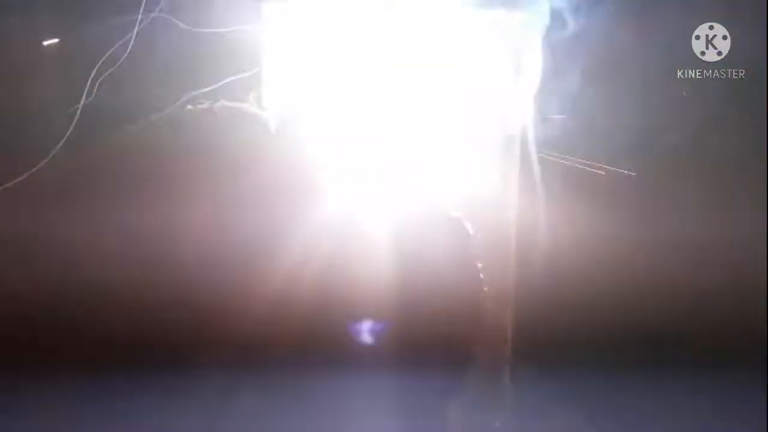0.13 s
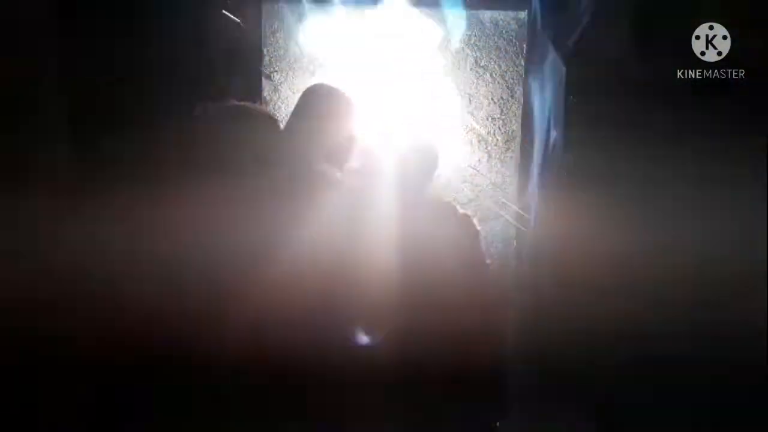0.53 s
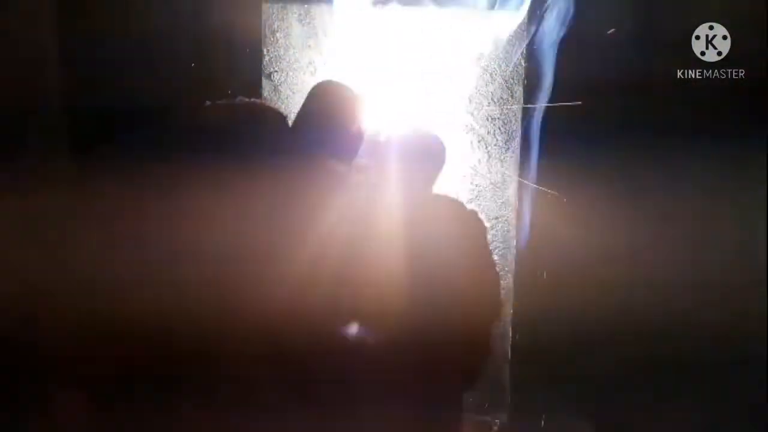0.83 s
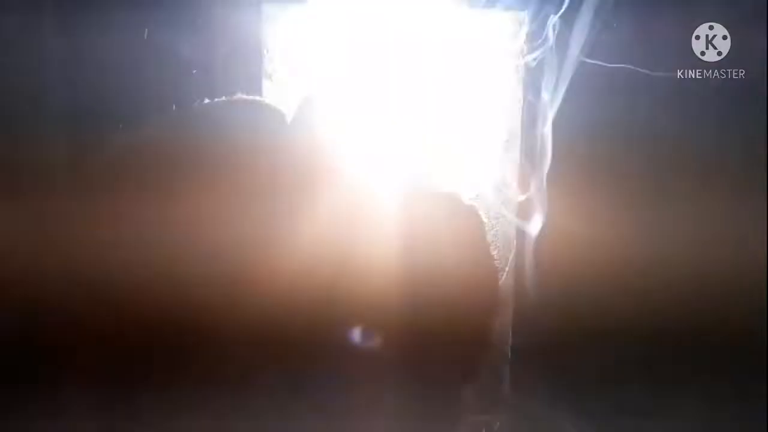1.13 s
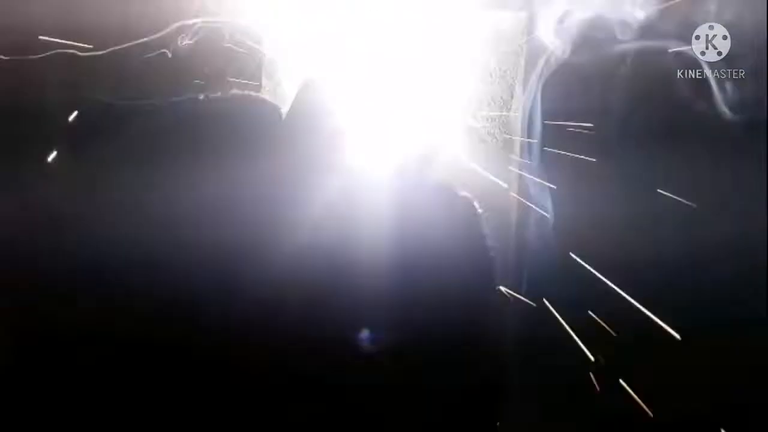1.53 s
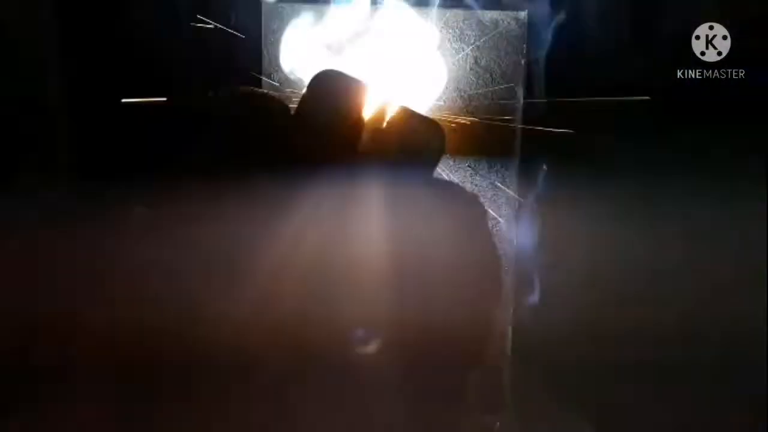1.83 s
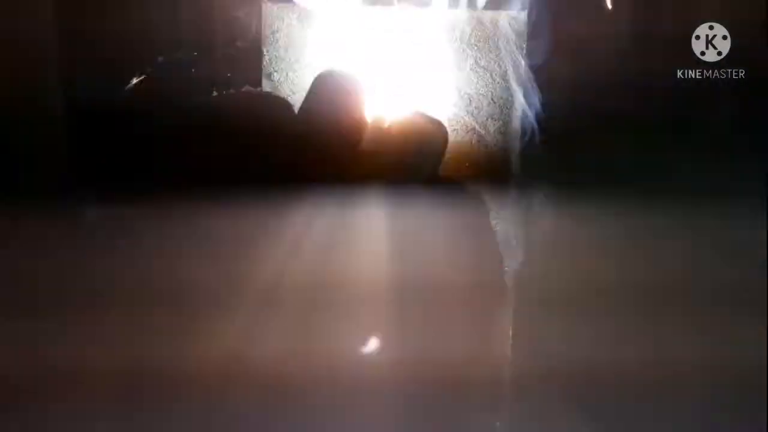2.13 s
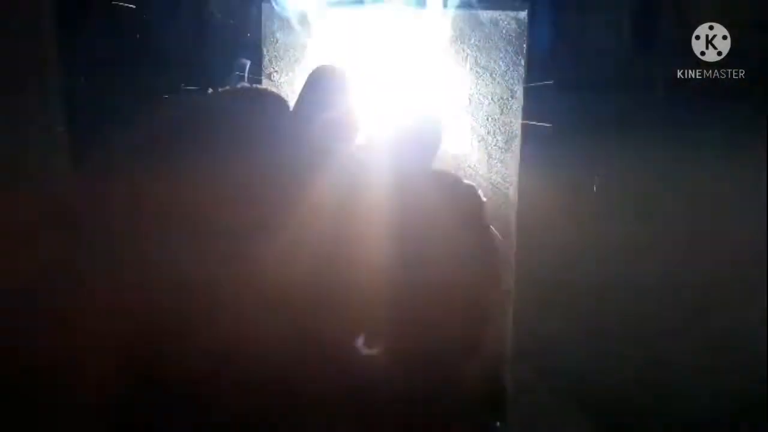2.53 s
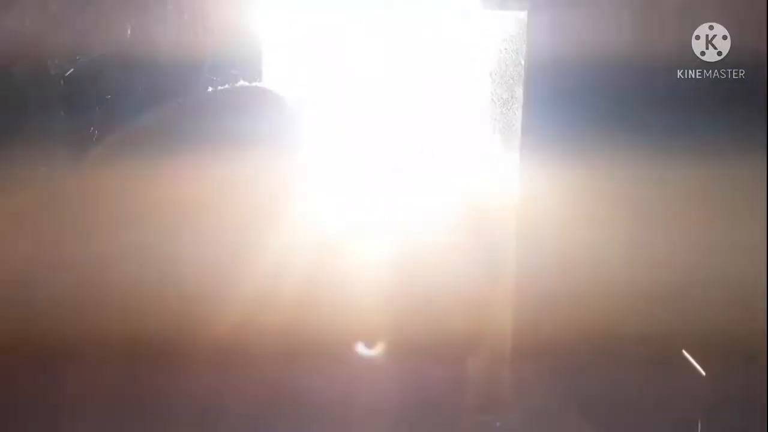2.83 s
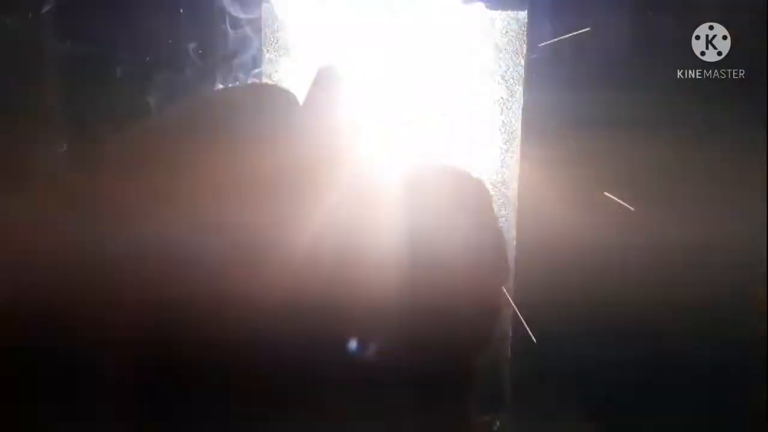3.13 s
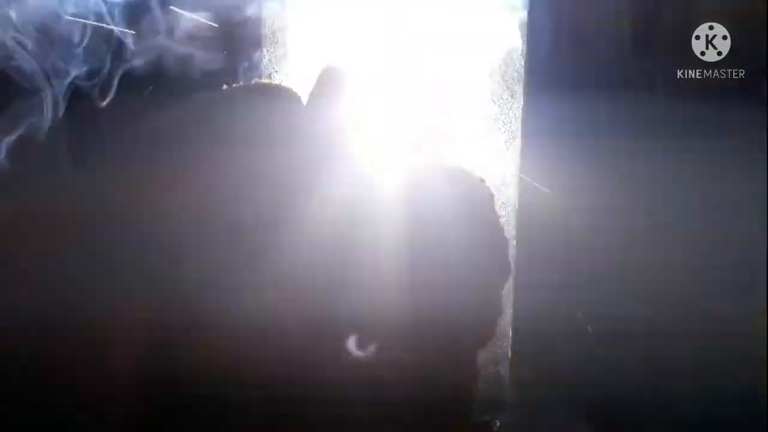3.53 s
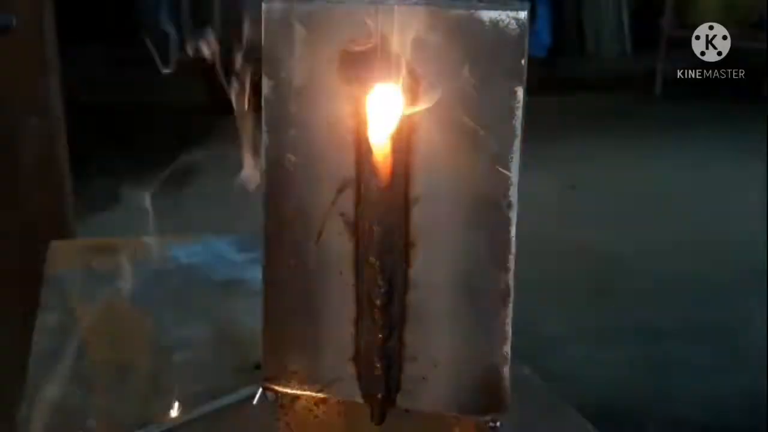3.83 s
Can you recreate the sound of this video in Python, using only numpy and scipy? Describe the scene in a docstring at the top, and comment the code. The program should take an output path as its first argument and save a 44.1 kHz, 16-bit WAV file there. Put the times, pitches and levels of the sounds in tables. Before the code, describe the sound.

A stick welding arc burns close to the microphone in a workshop, already running at the start: bright, fast-rippling sizzle, constant spits, fine clicks and a faint low hum. Sharp pops come irregularly, frequent from 0.3 to 0.9 seconds, clustered near 1.95, sparser after 2.3, with a pair around 3.2. At about 3.68 it tears off in quick snaps; a tick at 3.83 and a much fainter one at 3.95 sound over low shop noise.

```python
"""A stick welding arc sizzles and spits close to the microphone in a workshop, with sharp pops.
Tiny discharges swell with the ripple of the current; decaying clusters of them make spits and snaps.
Drops short the arc, so its gate dips, and jumps of pressure pop as it strikes again. Coloured noise rumbles.
The rod is pulled away, the arc tears off, and the hot bead ticks over the low noise of the shop."""
import sys
import numpy as np
from scipy import signal
from scipy.fft import rfft, irfft
from scipy.io import wavfile
from scipy.ndimage import uniform_filter1d

SR = 44100
rng = np.random.default_rng(int(sys.argv[2]) if len(sys.argv) > 2 else 0)


def persist_wave(psi):
    """Save psi, clipped to +-1, as 16-bit WAV."""
    counts = np.round(np.clip(psi, -1, 1) * 32767).astype(np.int16)
    wavfile.write(sys.argv[1], SR, np.atleast_2d(counts).T)


N = 176400  # samples, 4 s

RIPPLE_HZ = 180.24  # ripple of the welding current
ARC_OFF_S = 3.683  # the arc goes out

# The arc striking again: start_s, level_db (relative), sign of the pressure, crack_db (relative), sag_s
RESTRIKES = [(0.2843, -8, 1, -30, 0.0011), (0.3366, -12, 1, -27.5, 0.001), (0.4894, -15.5, -1, -38, 0.0011),
             (.5524, -17, -1, -27.5, 0.00095), (0.6502, -14.5, 1, -30, 0.0011),
             (0.7058, -8.5, 1, -25.5, 0.00073), (0.7194, -21, 1, -30, .0005),
             (.9187, -14.5, 1, -27.5, 0.00066), (1.2962, -7.5, 1, -28.5, .002),
             (1.5673, -16, -1, -24, .001), (1.6509, -12, 1, -28.5, 0.00083), (1.8664, -12, 1, -28, .0008),
             (1.9501, -8.5, -1, -24.5, 0.0011), (1.9555, -15, -1, -20, 0.00097),
             (1.962, -7, 1, -32, 0.0014), (1.9994, -8, -1, -23.5, 0.0011), (2.1777, -8.5, 1, -25.5, .0011),
             (2.322, -7, 1, -26, 0.00027), (3.215, -9, 1, -28, 0.0013), (3.275, -9, -1, -28, 0.00084)]
# Brief short circuits that clear with a small snap: clear_s, level_db
SHORT_CIRCUITS = [(.135, -39), (.527, -40), (.811, -30), (1.107, -31.5), (1.134, -32), (1.498, -44),
                  (1.511, -30), (1.72, -44), (2.112, -38), (2.373, -36.5), (2.597, -32), (2.618, -36),
                  (2.769, -33), (3.009, -30.5), (3.333, -43), (3.456, -52)]


def undb(db):
    """Decibels to amplitude gain."""
    return 10 ** (np.asarray(db) / 20)


def unit(x):
    """Scale to rms 1."""
    return x / np.sqrt(np.mean(x ** 2))


def colour(x, points, size=4096):
    """Causal minimum-phase filter of unit energy; its response follows (Hz, relative dB) points."""
    hz, db = np.array(sorted(points)).T
    grid_hz = np.maximum(np.fft.rfftfreq(size, 1 / SR), 1)
    gain = undb(np.interp(np.log(grid_hz), np.log(hz), db))
    # folding the cepstrum onto positive time gives minimum phase
    cepstrum = irfft(np.log(gain))
    cepstrum[1:size // 2] *= 2
    cepstrum[size // 2 + 1:] = 0
    ring = irfft(np.exp(rfft(cepstrum)))
    return signal.fftconvolve(x, ring / np.sqrt(np.sum(ring ** 2)))[:N]


def cut(x, hz, kind, order=1):
    """Gentle Butterworth low-pass or high-pass."""
    return signal.sosfilt(signal.butter(order, hz, kind, fs=SR, output="sos"), x)


def walk(rate_hz):
    """Random levels, new at the given rate and joined by ramps; rms 1."""
    step = int(SR / rate_hz)
    held = np.repeat(rng.standard_normal(N // step + 1), step)
    return unit(uniform_filter1d(held, step)[:N])


def sparks():
    """Dense tiny discharges of uneven size and random sign over a smooth hiss; rms 1."""
    sparks_per_s, spread_db, hiss_share = 5000, 4, 0.34
    struck = rng.random(N) < sparks_per_s / SR
    sign = np.sign(rng.standard_normal(N))
    clicks = struck * sign * undb(spread_db * rng.standard_normal(N))
    return unit(unit(clicks) + hiss_share * rng.standard_normal(N))


def bursts(rows, size=512):
    """Clusters of discharges start sharply and die fast; each level is the rms of its energy over 2 ms."""
    out, grain, age = np.zeros(N + size), sparks(), np.arange(size) / SR
    for start, db, length in rows:
        i = int(np.clip(start * SR, 0, N - size))
        # falls to 1/e at 1.22 times the nominal length
        burst = grain[i:i + size] * np.exp(-(age / (1.22 * length)) ** 1.14)
        out[i:i + size] += undb(db) * burst * np.sqrt(.002 * SR / np.sum(burst ** 2))
    return out[:N]


def shop():
    """The shop around the bench is a steady low noise, modelled as coloured noise."""
    shop_db = -55
    # Spectrum of the shop: frequency_hz, density_db (relative)
    shop_spectrum = [(25, -37), (55, -36), (100, -14), (150, -5), (190, 1.5), (260, -3.5), (380, -4.5),
                     (550, -7.5), (700, -9), (1300, -15.5), (1550, -14), (2000, -14), (3500, -23.5),
                     (8000, -27), (11000, -33), (16000, -60)]
    return undb(shop_db) * colour(rng.standard_normal(N), shop_spectrum)


def room(x, t):
    """The workshop walls return a faint, short tail, a decaying noise convolved with the weld."""
    t60_s, first_echo_s, low_hz, high_hz = 0.28, .004, 1800, 7400
    room_db = -16.5  # set ahead of the tail's two filters
    tail = rng.standard_normal(N) * np.exp(-np.log(1000) * t / t60_s) * (t > first_echo_s)
    tail = tail / np.sqrt(np.sum(tail ** 2))
    tail = cut(cut(tail, high_hz, "low", order=2), low_hz, "high")
    return undb(room_db) * signal.fftconvolve(x, tail)[:N]


def burning(t):
    """1 while the arc burns; drops just before each short clears and each pop starts; closes at arc-off."""
    short_s, short_db = .004, -12  # how long and how deeply a drop of metal quenches the arc
    gate = 1. * (t < ARC_OFF_S)
    for relit, *_ in SHORT_CIRCUITS + RESTRIKES:
        gate[(t > relit - short_s) & (t < relit)] = undb(short_db)
    return uniform_filter1d(gate, size=30)  # softens the edges


def slag(t):
    """The crust on the bead ticks as it cools; each tick is a decaying burst of coloured noise."""
    # Ticks of the cooling slag: start_s, level_db (at the onset, ahead of colouring), decay_s
    ticks = [(3.833, -26, 0.00051), (3.9535, -46.5, .005)]
    # Spectrum of a tick: frequency_hz, density_db (relative)
    slag_spectrum = [(200, -24), (1200, -3), (2000, -11), (3200, -2.5), (7500, -2), (11000, -14),
                     (15000, -40)]
    env = sum(undb(db) * (t >= start) * np.exp(-np.abs(t - start) / decay) for start, db, decay in ticks)
    return colour(env * rng.standard_normal(N), slag_spectrum)


def hum(t, gate):
    """The rippling current hums faintly in harmonics of the ripple while it flows."""
    # Hum of the current: multiple of the ripple, level_db (rms while the gate is 1)
    harmonics = [(1, -69.5), (2, -69), (3, -71), (4, -79.5), (5, -70.5), (7, -78.5), (9, -72)]
    tones = 0
    for multiple, db in harmonics:
        turns = round(multiple) * RIPPLE_HZ * t + rng.random()
        tones = tones + np.sqrt(2) * undb(db) * np.sin(2 * np.pi * turns)
    return gate * tones


def roar(t, gate):
    """Hot gas rumbles under the arc, and discharges flare as the arc is stretched."""
    roar_db, unrest_db, unrest_hz = -62.5, 1.06, 28
    tear_s, tear_db = 0.029, -35
    # Spectrum of the gas: frequency_hz, density_db (relative)
    gas_spectrum = [(30, -30), (80, -37.5), (130, -6.5), (190, 9), (280, -7.5), (400, -3.5), (600, -12),
                    (1000, -15.5), (1700, -22.5), (3000, -2), (8000, -55)]
    # Spectrum of the tearing arc: frequency_hz, density_db (relative)
    tear_spectrum = [(50, -21), (170, 3.5), (600, 2.5), (1200, -9.5), (2600, -3.5), (6000, -14),
                     (14000, -38)]
    level = undb(roar_db + unrest_db * walk(unrest_hz))
    gas = colour(rng.standard_normal(N) * gate * level, gas_spectrum)
    stretch = np.clip((t - ARC_OFF_S + tear_s) / tear_s, 0, 1) ** .5
    return gas + colour(sparks() * gate * stretch * undb(tear_db), tear_spectrum)


def pops(t):
    """Each pop is a jump of pressure that sags and swings back; a slow sag thuds, a quick one clicks."""
    offset_db, low_hz, high_hz = 0.5, 138, 4300
    push = 0
    for start, db, sign, _, sag in RESTRIKES:
        fall = np.exp(-np.minimum(np.abs(t - start) / sag, 20))
        push = push + np.sign(sign) * undb(db + offset_db) * (t >= start) * fall
    return cut(cut(push, low_hz, "high", order=2), high_hz, "low", order=2)


def rippled_sizzle(t):
    """Discharges swell on each crest of the current, no two crests alike; every second trough ticks."""
    first_crest_s = .0028
    ripple_db, scatter_db = 5, 2.5  # swing either side of the middle, spread between cycles
    unrest_db, unrest_hz = 0.91, 34.88
    restrike_db, restrike_cycles = 12.5, 0.029  # tick ahead of levelling, and its half width at 1/e
    cycle = (t - first_crest_s) * RIPPLE_HZ
    scatter = rng.standard_normal(N)[np.round(cycle + 1).astype(int)]  # one draw per crest
    wave_db = ripple_db * np.cos(2 * np.pi * cycle)
    swing = undb(wave_db + scatter_db * scatter + unrest_db * walk(unrest_hz))
    restrike = undb(restrike_db) * np.exp(-((cycle % 2 - .5) / restrike_cycles) ** 2)
    return unit(swing + restrike) * sparks()


def flecks():
    """Fine spatter gives lone clicks, scattered at random well above the sizzle."""
    flecks_per_s, fleck_db, spread_db = 55, 23, 2  # level relative to the sizzle
    size_db = fleck_db + spread_db * np.clip(rng.standard_normal(N), -2, 2)
    return (rng.random(N) < flecks_per_s / SR) * undb(size_db)


def sizzle(t, gate):
    """Sizzle and flecks follow the burn; spits, snaps and cracks stand out; the colour shifts along the seam."""
    sizzle_db, spit_db, crack_offset_db = 0.5, -5, -0.5  # offsets on the levels in the tables
    clear_s, crack_s = 0.00042, 0.00052  # nominal lengths: snap that clears a short, crack of a pop
    spit_low_hz = 2640  # spits are thinner and brighter than the sizzle
    travel_start_s, travel_end_s = 0.69, 2.74  # the rod moves along the seam
    # Course of the sizzle: time_s, level_db (relative)
    burn = [(0, -42), (.55, -44.5), (1.03, -41.5), (1.56, -41.5), (1.82, -44), (2.45, -45), (2.6, -42.5),
            (2.75, -41), (3.36, -41.5), (3.55, -43.5), (3.65, -42.5)]
    # Spits of molten metal: start_s, level_db (relative), length_s (nominal)
    spits = [(0.1017, -28.0, 0.00084), (0.1068, -27, 0.0012), (0.157, -22, 0.0016), (0.162, -24, 0.0019),
             (0.1686, -20, 0.001), (0.1739, -22.5, 0.0012), (0.2735, -27, 0.00078), (0.3242, -21, 0.0014),
             (0.3458, -27.0, 0.0014), (0.4446, -21, 0.0014), (0.5053, -27.5, 0.0015), (0.6006, -17, 0.003),
             (0.6228, -23, 0.0022), (0.6454, -18, 0.0014), (0.7012, -22.5, 0.001), (0.779, -19.5, 0.0012),
             (0.8122, -25.5, 0.0016), (0.8185, -22, 0.00054), (0.8288, -27, 0.0014), (0.8781, -26, 0.0015),
             (0.9287, -25, 0.0023), (0.9735, -24.5, 0.0011), (1.0179, -28.5, 0.001), (1.0444, -33, 0.002),
             (1.1016, -30, 0.00065), (1.1078, -22, 0.00056), (1.1557, -24, 0.0016), (1.1622, -30, 0.0017),
             (1.1724, -25, 0.0019), (1.178, -29, 0.0022), (1.238, -32, 0.002), (1.2445, -20.5, 0.0016),
             (1.317, -21.5, 0.0018), (1.328, -25.0, 0.0014), (1.3321, -24, 0.0025), (1.4114, -26, 0.0017),
             (1.4385, -25, 0.0016), (1.4501, -24, 0.0011), (1.5116, -31, 0.00098), (1.5442, -36, 0.0019),
             (1.561, -22, 0.0021), (1.5895, -26.0, 0.0012), (1.6005, -41, 0.0021), (1.7118, -23.5, 0.001),
             (1.7432, -22, 0.0021), (1.7497, -27, 0.0015), (1.782, -23.5, 0.0024), (1.8094, -23.5, 0.0021),
             (1.8161, -25, 0.0031), (1.8992, -20.5, 0.0029), (2.0044, -22, 0.0022), (2.0212, -25.0, 0.0009),
             (2.0882, -24.5, 0.0018), (2.1828, -25, 0.0017), (2.3031, -21.5, 0.0011),
             (2.4211, -19.5, 0.0018), (2.5976, -27, 0.0026), (2.6377, -24, 0.0016), (2.6422, -26, 0.0023),
             (2.6768, -22.5, 0.0016), (2.7089, -19, 0.0015), (2.715, -23, 0.0019), (2.7309, -22, 0.0019),
             (2.7355, -23.5, 0.0025), (2.7934, -28.0, 0.0016), (2.8871, -28.0, 0.0017),
             (2.9644, -30, 0.001), (2.9804, -18, 0.0005), (2.9867, -20, 0.0015), (3.009, -26.0, 0.0008),
             (3.0646, -18.5, 0.0012), (3.1304, -22.5, 0.0028), (3.1752, -19.5, 0.0017),
             (3.2087, -19, 0.0013), (3.3472, -30, 0.0025), (3.3635, -27, 0.0022), (3.3974, -22.5, 0.0023),
             (3.4402, -20, 0.0033), (3.5302, -21, 0.0032), (3.5856, -24.5, 0.0011)]
    # Snaps of the arc tearing off: start_s, level_db, length_s (nominal)
    snaps = [(3.6595, -30.5, 0.0018), (3.668, -33, 0.0011), (3.6737, -35, 0.00083), (3.6808, -25, 0.00094)]
    # Colour along the seam: frequency_hz, start_density_db (relative), end_density_db (relative)
    seam_spectra = [(150, -38, -33), (600, -18.5, -19.5), (1420, -18.5, -18.5), (1820, -23.5, -22),
                    (2256, -5.5, -7.5), (2750, -6.5, -5.5), (3600, -9, -9.5), (3990, -6.5, -8.5),
                    (4230, -13.5, -15), (4594, -8.5, -6), (5170, 0.5, -2.5), (5770, -3, -2), (6156, -8, -9),
                    (6450, -14.5, -16.5), (6955, -3.5, -2), (7310, -1.5, 0), (8560, -7, -2),
                    (8920, -9.5, -7), (9400, -5, -16), (9470, -3, -7.5), (10200, -5.5, -5),
                    (10900, -2.5, -4), (11550, -7.5, -9.5), (12200, -22, -14.5), (13000, -15.5, -18),
                    (14000, -20, -21), (15200, -27, -28), (18000, -37, -55)]

    level = undb(sizzle_db + np.interp(t, *np.array(burn).T))
    steady = (rippled_sizzle(t) + flecks()) * gate * level
    clearings = [(cleared, db, clear_s) for cleared, db in SHORT_CIRCUITS]
    cracks = [(start, db + crack_offset_db, crack_s) for start, _, _, db, _ in RESTRIKES]
    spitting = undb(spit_db) * cut(bursts(spits), spit_low_hz, "high")
    crackle = steady + spitting + bursts(snaps + clearings + cracks)

    moved = np.clip((t - travel_start_s) / (travel_end_s - travel_start_s), 0, 1)
    first = colour(crackle, [(hz, db) for hz, db, _ in seam_spectra])
    last = colour(crackle, [(hz, db) for hz, _, db in seam_spectra])
    return (1 - moved) * first + moved * last


def scene():
    """The arc and the bead, their echo, and the steady noise of the shop."""
    t = np.arange(N) / SR
    gate = burning(t)
    weld = slag(t) + hum(t, gate) + roar(t, gate) + pops(t) + sizzle(t, gate)
    return (weld + room(weld, t) + shop())[None]


def record(dry):
    """The recorder cuts the top with a steep low-pass."""
    top_hz = 15500
    return signal.sosfilt(signal.ellip(8, .2, 70, top_hz, fs=SR, output="sos"), dry)


dry = scene()
out = record(dry)
persist_wave(out)
```